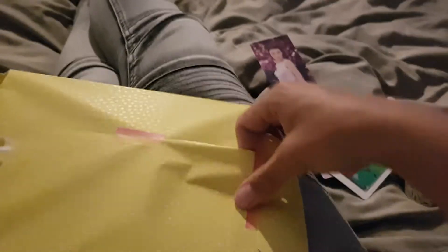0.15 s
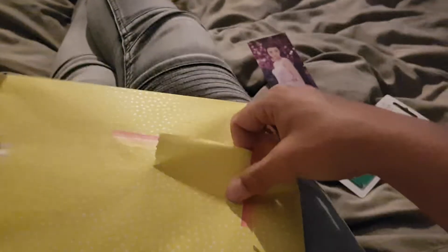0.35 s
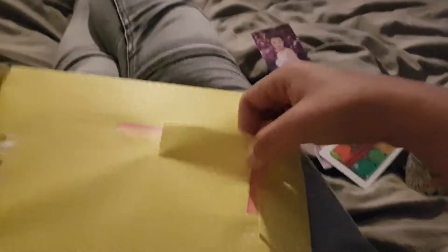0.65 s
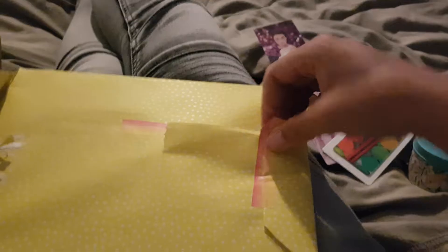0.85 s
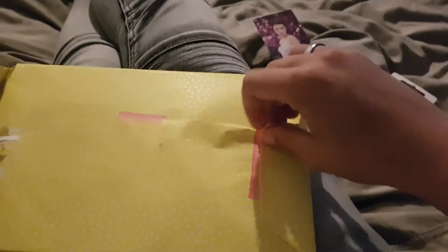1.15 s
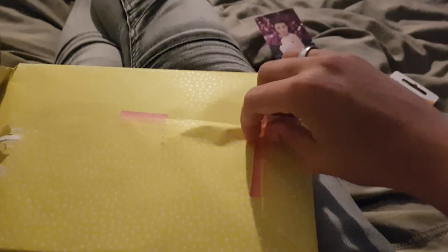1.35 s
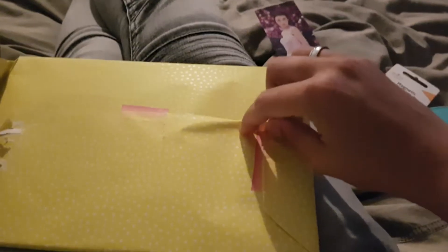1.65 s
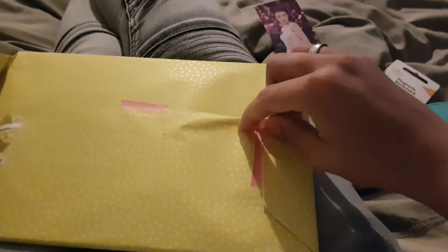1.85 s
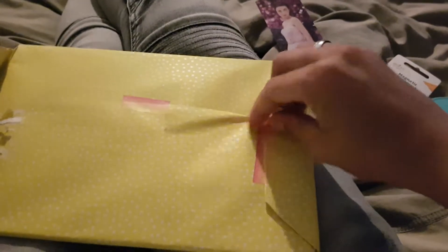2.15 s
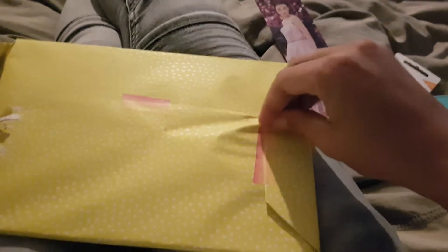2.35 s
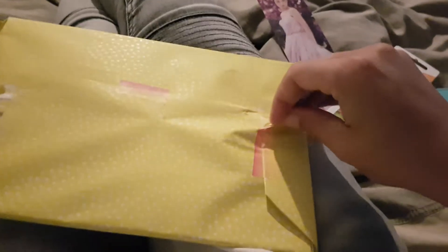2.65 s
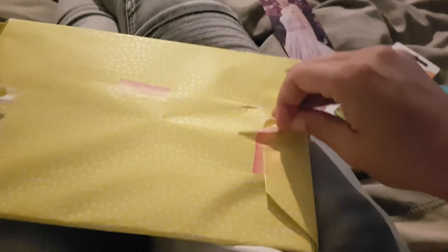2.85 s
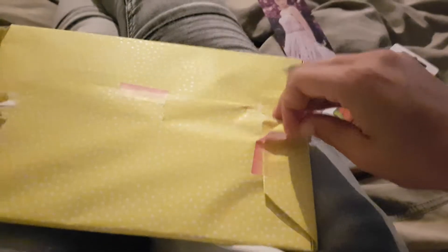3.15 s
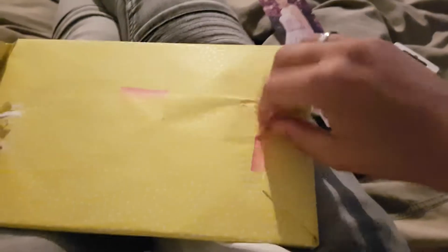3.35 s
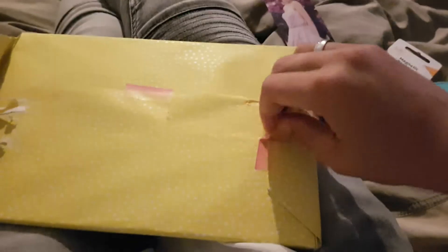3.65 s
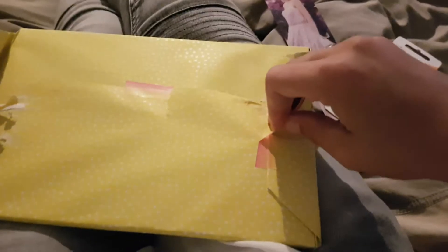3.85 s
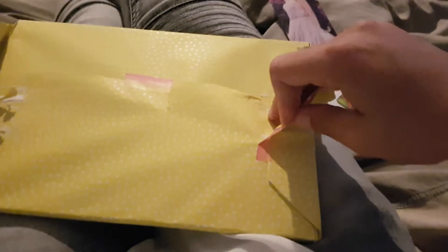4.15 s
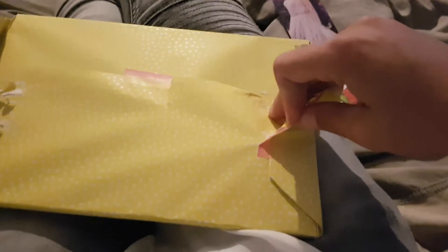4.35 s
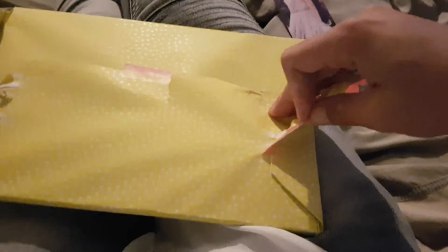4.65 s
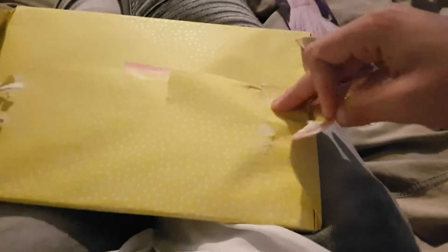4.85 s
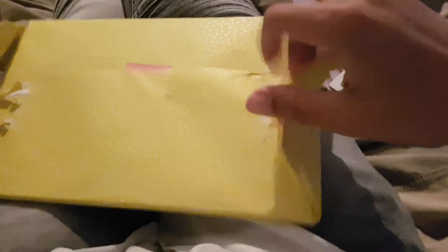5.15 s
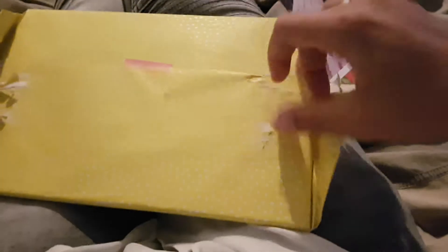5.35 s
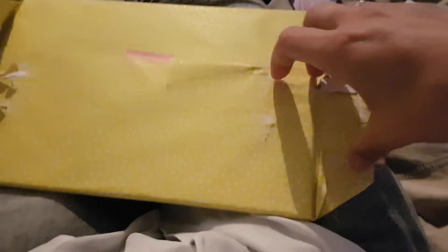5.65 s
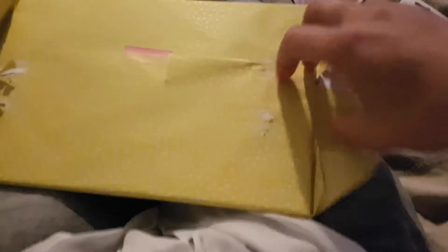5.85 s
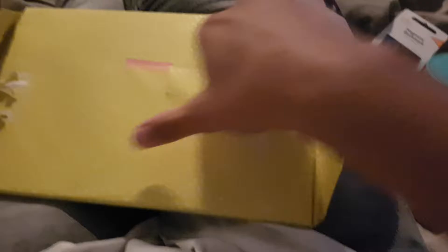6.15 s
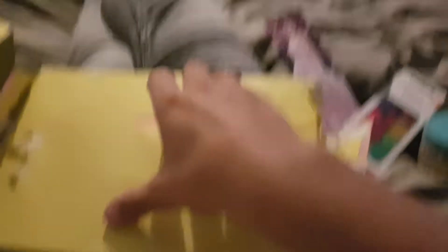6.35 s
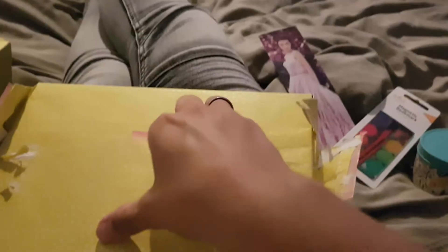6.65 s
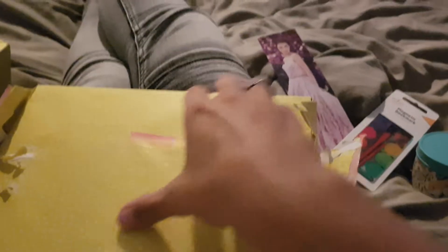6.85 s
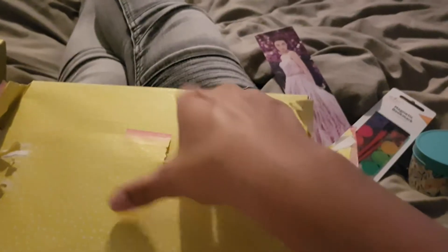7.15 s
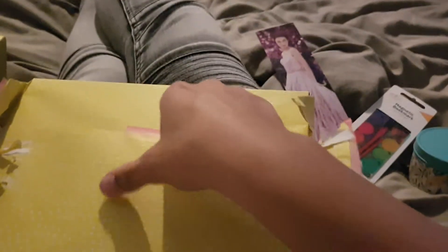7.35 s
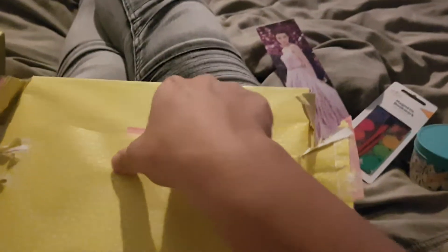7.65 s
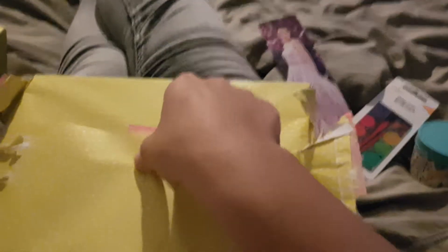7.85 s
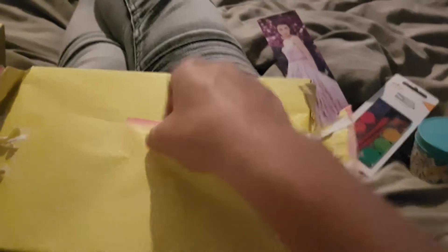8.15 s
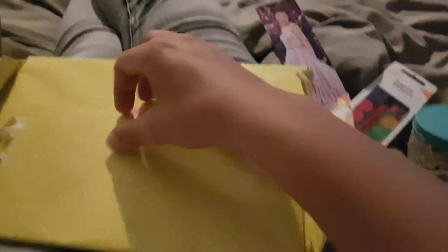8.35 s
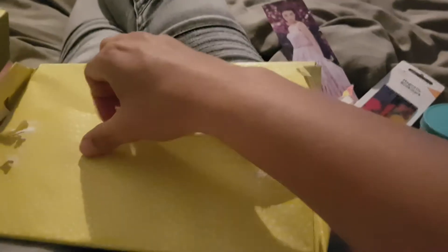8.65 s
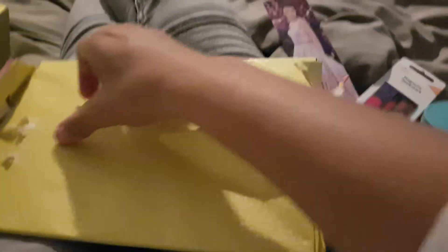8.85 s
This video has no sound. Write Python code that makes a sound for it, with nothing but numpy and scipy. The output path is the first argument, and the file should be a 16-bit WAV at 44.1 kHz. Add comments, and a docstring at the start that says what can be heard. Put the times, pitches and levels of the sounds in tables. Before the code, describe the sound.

Crisp paper snaps and short rips come in clumps, each with a dry bright edge and a little hollow box knock. A hard burst opens, quiet picking follows, tearing grows loud again midway, then skin brushes and rubs over the sheet as the parcel shifts. Close handheld microphone in a quiet furnished bedroom, with slight hiss and low hum.

```python
"""Stiff wrapping paper snaps and crackles as a hand picks open a taped box on a lap, close to a phone.
Each snap is a facet of paper flipping over: its ringing, its sharp fold and the hollow box sound together.
Random clicks make the crackle of paper and tape; rubbing noise follows the hand as it slides and turns the box.
A small soft-furnished room adds echoes and a short tail, over a faint low hum and microphone hiss."""
import sys
import numpy as np
from scipy import signal
from scipy.fft import rfft, irfft, next_fast_len
from scipy.io import wavfile
from scipy.ndimage import uniform_filter1d, map_coordinates

SR = 44100
rng = np.random.default_rng(int(sys.argv[2]) if len(sys.argv) > 2 else 0)


def wrap_up_sound(samples):
    """Save the sound to the file named by the first command line argument, as 16-bit audio."""
    columns = np.atleast_2d(samples).T
    # keep every value between -1 and 1, then stretch to whole-number steps
    tamed = np.clip(columns, -1, 1)
    steps = np.round(tamed * 32767).astype(np.int16)
    wavfile.write(sys.argv[1], SR, steps)


N = 396459  # length of the scene in samples
MS = SR / 1000  # samples in a millisecond

# colour of sharp creases in the paper: pitch_hz [Hz], gain_db [dB, relative]
CREASE_TONE = [(3500, -49), (6000, -7), (7400, -5), (8900, 3.5), (11300, 2), (13000, 0.5), (15300, -2.5),
               (17000, -18)]
# the free part of the sheet rings higher as it is pulled taut: time_s [s], pitch_hz [Hz]
TAUTNESS = [(0, 2534), (.3, 3354), (.85, 2430), (1.02, 3160), (2.1, 3550), (3.18, 3660), (3.46, 2200),
            (3.6, 3100), (4.33, 2840), (5.11, 2190), (5.299, 3500), (5.5, 2210), (6.8, 1553), (7.05, 3283),
            (7.44, 2540), (7.99, 2817), (8.55, 1880), (8.99, 2466)]
# how the hand works the paper: time_s [s], crackle_share [0-1, the rest is smooth sliding],
# apart_share [0-1, share of the sound that differs between the microphones]
GRIP_STYLE = [(0, 0.1, 0.37), (.6, 0.12, 0.42), (1.6, 0.4, 0.31), (1.9, 0.93, 0.63), (2.5, 0.67, 0.37),
              (3.15, 0.52, 0.21), (3.45, 0.62, .4), (4.1, 0.66, 0.59), (4.7, 0.23, 0.32), (5.5, 0.4, 0.37),
              (5.85, .3, 0.81), (6.2, 0, 0.72), (7.1, .05, .75), (7.45, 0.06, 0.91), (7.95, 0.2, .7),
              (8.2, .06, 1), (8.99, 0.02, 0.87)]
# the hand slides over the parcel and shifts it on the lap: start_s [s, at full strength], attack_s [s],
# hold_s [s], release_s [s], rub_db [dB before channel trims], shuffle_db [dB before channel trims],
# patch_hz [Hz, resonance of the patch under the hand]
HAND_STROKES = [(0, .01, 0.16, 0.52, -60, -66, 1150), (0.248, 0.037, 0, 0.011, -45, -49, 800),
                (.339, 0.054, 0, .035, -40.5, -46, 1093), (0.422, .05, 0.11, .16, -61.5, -64, 1410),
                (.76, .06, .4, .35, -65.5, -62.5, 1230), (1.497, .05, 0, .08, -65, -73, 1060),
                (1.718, .04, 0, 0.069, -62.5, -75, 1020), (2.455, 0.15, 0.06, .3, -62, -71, 1050),
                (2.863, 0.064, 0, 0.11, -62, -60, 1192), (3.304, 0.029, 0.42, 0.098, -64.5, -67.5, 1454),
                (3.792, .1, 0, 0.23, -53, -62.5, 1438), (4.16, 0.079, 0, 0.04, -47.5, -58, 1480),
                (4.279, 0.046, 0.0086, 0.28, -62, -63.5, 1490), (4.61, 0.087, 0, .16, -55, -57, 1325),
                (4.778, 0.043, 0.01, 0.067, -38.5, -55, 1080), (4.929, 0.074, 0, 0.034, -53, -70, 970),
                (5.138, 0.16, 0.018, 0.038, -53, -63, 1490), (5.248, .04, 0.0028, .09, -56.5, -53, 1066),
                (5.557, .1, 0.0074, .18, -57, -60, 1660), (5.807, 0.069, 0, 0.05, -49.5, -66, 1170),
                (5.917, 0.033, 0.024, 0.07, -50.5, -55, 1260), (6.033, 0.058, 0.017, .09, -48, -63, 1350),
                (6.215, 0.18, 0.049, 0.41, -56.5, -66, 1349), (6.465, 0.038, 0.0064, .035, -48, -69, 761.4),
                (6.565, 0.078, 0.016, 0.031, -42, -55, 700), (6.79, 0.092, 0.11, .1, -59, -72, 1174),
                (6.941, 0.13, 0.14, .1, -53, -65.5, 708), (7.115, 0.1, 0, .1, -45.5, -59.5, 1230),
                (7.311, 0.056, 0.11, 0.13, -55, -60.5, 1180), (7.772, .2, 0, 0.054, -56, -56, 1270),
                (7.932, 0.16, 0.022, 0.17, -58.5, -61.5, 1395), (8.154, 0.034, 0.16, .1, -61, -67.5, 1175),
                (8.491, 0.24, 0, 0.042, -51.5, -62.5, 997), (8.544, .035, .03, .18, -47, -60.5, 825),
                (8.75, .06, 0.0018, .1, -58, -81, 920), (8.93, .15, .06, .1, -61.5, -67, 987)]


def snaps():
    """The sheet buckles and rips in single snaps, with small ticks and finger taps between them."""
    # large snaps: start_s [s], level_db [dB rms over a millisecond], pitch_hz [Hz, of the facet],
    # edge_db [dB over the level, crisp fold], knock_db [dB over the level, box, before 0.5 dB is added],
    # crumble [0-1, share of the energy in crumbling], pan_db [dB, left over right]
    large_snaps = [(.0888, -35, 2810, -2, -7, 0.95, 1), (.093, -39, 3270, 1, -22, 0.22, 5),
                   (.1465, -25.5, 2915, 0, -10.5, 0.27, 0), (.2482, -29, 2090, -1.5, 0.5, 0.36, 0.5),
                   (.2791, -26, 3440, 0, -6.5, 0.64, 2), (.3116, -25, 2610, -3, -7, 0.66, -1),
                   (.3282, -14.5, 3390, -2, -17, 0.7, 2), (.3419, -30, 3500, 6, -3, 1, 3),
                   (.3592, -25.5, 2900, 3, -9.5, 0.87, 0), (.4719, -43, 1966, -17, 1, 0.6, 2),
                   (.481, -42.5, 1400, -14, -7.5, 0.72, 2), (.7443, -40, 2650, -4.5, -9, 0.41, 1.5),
                   (.9554, -43.5, 2703, 0, -6, .6, -1), (.9623, -40, 3765, -7, -15.5, 0.46, 3),
                   (1.13, -53, 1500, -2, 5.5, 0.5, -1), (1.1655, -45.5, 1850, -5, -5.5, 0.8, -3),
                   (1.2192, -51.5, 3000, 3.5, -7, 0.93, 1), (1.3337, -54, 3400, 13.5, -19, 0.6, 5),
                   (1.7151, -45.5, 3400, 2.5, -2, 0.44, 4), (1.957, -52.5, 3000, 11, 1.5, 0.93, 4.5),
                   (1.9836, -54.5, 4400, 21.5, 7, 0.97, 1), (2.0895, -55.5, 3420, 12, -3, 0.3, 1),
                   (2.1175, -50, 3200, 10, -13, 0.72, 2), (2.2346, -32, 3690, -5, -31, 0.12, 3.5),
                   (2.4543, -47.5, 2700, -1, 2, 0.83, 0), (2.5646, -34.5, 3615, -12, -17.5, 0, 4),
                   (2.5736, -40.5, 3570, -8, -13, 0.5, -6), (2.5351, -44.5, 3314, -3, -18, 0.97, 0),
                   (2.7223, -44, 4130, -7, -18, 0, 0), (2.741, -47, 3700, 1, -21, .36, 0),
                   (2.7783, -41, 3550, 7, -28.5, 0.26, 1), (2.9501, -37, 4300, 9.5, -7, .3, 1),
                   (3.0235, -40.5, 3900, -14, -30, 0.56, 0), (3.0334, -38, 3450, -0.5, -19, 0.27, -4),
                   (3.1002, -42.5, 3600, -3, -13, .45, -2), (3.2977, -49.5, 3100, -6, -6, 0.87, 3),
                   (3.3988, -46.5, 2070, -15, -4, 0.83, 4), (3.4782, -57, 1685, 8, 3, 0.69, -1.5),
                   (3.634, -46.5, 2754, 2.5, -1, 1, 1), (3.6939, -41, 3225, -1, -11, 0.19, 0.5),
                   (3.7668, -34, 3050, 0, -12, 0.57, 3), (3.8037, -42.5, 2300, -17.5, -7, .05, -4),
                   (3.8146, -40, 2410, -22, -3, 0.02, 4), (3.8922, -34, 2530, -6, -9, .97, 4),
                   (3.8988, -35, 2805, -1, -7.5, 0.69, 2.5), (3.9892, -43, 2723, 2.5, -15, 0.45, 8),
                   (4.0181, -26, 3020, -11.5, -9.5, 0.63, 4), (4.0529, -37.5, 2900, -4, -10, .43, 0),
                   (4.0955, -35, 2640, -2, -17, 0.86, 5.5), (4.1652, -31.5, 2588, -8, -21.5, 0.46, 6),
                   (4.2136, -37.5, 2843, -2.5, -16, 0.34, 4), (4.3176, -36, 3100, -9, -17, 0.1, 5),
                   (4.4668, -37, 2920, -8, -17.5, 0.33, 9), (4.4806, -39, 3040, -3, -18, 0.14, 0),
                   (4.568, -40.5, 2900, 3.5, -9, 0.23, 3), (4.6093, -20.5, 2380, -11, -8.5, 0.3, 3.5),
                   (4.6272, -31, 2860, 0, -11, 0.34, -3.5), (4.651, -37, 2980, 1, -11, 0.86, 2),
                   (4.671, -36.5, 2980, 0, -21, 0.25, -3), (4.7443, -32, 2820, -0.5, -12.5, 0.8, 1),
                   (4.7741, -15, 2770, -2, -9.5, 0.42, 2), (4.8255, -40, 3700, 5, -17, 0.36, -1.5),
                   (4.8372, -34.5, 2800, 8, -10.5, 0.66, -.5), (4.9099, -34.5, 1850, -3.5, -3, 0.56, 3.5),
                   (5.0707, -46, 3140, -5, -12, 0.27, 2), (5.0937, -37.5, 3000, -10, -10, 0.64, 1.5),
                   (5.129, -35.5, 1850, -17, -24.5, 0.77, 1), (5.1425, -43, 1790, -14, -24, 0.84, 5),
                   (5.2403, -32.5, 2940, -1, -5, 1, 1), (5.2603, -33.5, 4910, 3, -24, 0.64, 2),
                   (5.3397, -53, 3230, 10.5, -4, .5, -1), (5.3473, -49, 3155, 11.5, -4, 0.9, 8),
                   (5.5455, -36.5, 2088, -21, -13, 0.5, 5), (5.7782, -45, 1832, -6, 6, 0.4, 0),
                   (5.7922, -40, 1476, -11, -4, 0.32, -1), (5.8112, -38.5, 2090, -16, -0.5, 0.2, -1),
                   (5.8278, -36, 1810, -22, -14, 0.88, 4), (5.8395, -38.5, 2790, -14.5, 0, 0.47, -1),
                   (5.9523, -42, 2190, -17, -0.5, 0.61, 2), (6.2063, -44.5, 2660, -0.5, -3, 0.76, 2.5),
                   (6.6569, -43, 2090, 1.5, 5.5, 0.62, 0), (6.7003, -44.5, 1646, -18.5, -2, 1, -0.5),
                   (6.9946, -44, 4024, -14, -12, 0.24, 8), (7.0796, -41, 3224, 10.5, -7, 0.66, 0),
                   (7.1921, -30.5, 3050, -9, -4, 0.78, 2.5), (7.285, -39, 2976, -3, -5, 0.74, 4),
                   (7.3172, -49.5, 2000, -10.5, 10.5, .35, 1), (7.3947, -34, 2707, -9, -1, .98, 1),
                   (7.472, -42.5, 3330, 11, -1.5, 0.66, 1.5), (7.7672, -40, 3560, 4.5, -6.5, 0.3, 5.5),
                   (7.9284, -43, 4470, 8.5, -13, 0.57, 4.5), (7.9866, -37, 3110, 1.5, -13.5, 0.33, 6),
                   (8.062, -44.5, 2160, -3.5, -6, 1, -1), (8.216, -48.5, 2000, -3.5, 7.5, 0.7, 0.5),
                   (8.3226, -43, 2730, 7, -6, 0.93, 3)]
    out = np.zeros((2, N + SR))
    rows = list(large_snaps) + ticks(count=75) + finger_taps(count=45)
    for start_s, level_db, pitch_hz, edge_db, knock_db, crumble, pan_db in rows:
        sound = snap(pitch_hz, edge_db, knock_db, crumble, damping=0.49, crumble_ms=4.44,
                     lead_ms=1.0, ripple_db=1.5, travel_ms=1.71)
        start = max(round(start_s * SR - 3 * MS), 0)  # the flip comes 3 ms into the sound
        sides = amp([[level_db + pan_db / 2], [level_db - pan_db / 2]])
        out[:, start:start + sound.shape[1]] += np.sqrt(MS) * sides * sound
    return out[:, :N]


def snap(pitch_hz, edge_db, knock_db, crumble, damping, crumble_ms, lead_ms, ripple_db, travel_ms, size=4096):
    """One facet flips over amid a burst of tiny creases; the facet, its sharp fold and the box all ring."""
    # modes of the wrapped box: pitch_hz [Hz], width_hz [Hz], level_db [dB before a random change]
    box_modes = [(183, 47, -11.5), (260, 150, -10), (418, 42, -4.5), (495, 47, -5.5), (610, 50, -8.5),
                 (696, 120, -14.5), (862, 96, -1.5), (1090, 470, -7), (1170, 86, -5)]
    # tone of a flipping facet: pitch_hz [Hz], gain_db [dB, relative]
    facet_tone = [(400, -28), (700, -2), (950, 3), (1400, 3), (2000, 6), (2500, 1.5), (3200, 1),
                  (4300, 3.5), (5200, 1.5), (7000, -5.5), (10000, -25.5)]
    t_ms = np.arange(size) / MS - 3
    crumble = np.clip(crumble, 0, 1)

    # bending waves are dispersive: a long rip sends its highs ahead of its lows
    bins = np.fft.rfftfreq(size, 1 / SR)
    late = crumble * travel_ms * MS * (np.exp(-bins / 7000) - .5)
    click = np.arange(size) == np.argmin(np.abs(t_ms))
    flip = irfft(rfft(click) * np.exp(-2j * np.pi * np.cumsum(late) / size))

    swell = np.exp(-np.maximum(t_ms / crumble_ms, -t_ms / lead_ms))
    uneven_size = amp(4.9 * rng.standard_normal(size))
    creases = swell * uneven_size * ports(rng.standard_normal((3, size)), apart=0.46)

    def strike(response):
        """The flip and the creases both excite one response, at energy 1 in each channel."""
        burst = one_blow(through(creases, response))
        clean = through(flip[None], response)
        return one_blow(np.sqrt(1 - crumble) * clean + np.sqrt(crumble) * burst)

    # every facet has its own shape, and so its own uneven set of modes
    knots = np.geomspace(300, SR / 2, num=40)
    uneven = np.column_stack([knots, ripple_db * rng.standard_normal(len(knots))])

    def facet_gain(hz):
        """A damped mode at the facet's pitch, coloured like paper."""
        mode = np.abs(resonance(hz, pitch_hz, damping * pitch_hz))
        return mode * amp(along(facet_tone, hz) + along(uneven, hz))

    def fold_gain(hz):
        """The bright colour of a sharp crease."""
        return amp(along(CREASE_TONE, hz) + along(uneven, hz))

    def box_gain(hz):
        """The box modes, struck a little differently each time, with softened highs."""
        power = 0
        for centre, width, db in box_modes:
            power += np.abs(amp(db + rng.normal(0, 1.2)) * resonance(hz, centre, width)) ** 2
        return np.sqrt(power) / np.sqrt(1 + (hz / 1800) ** 4)

    sound = strike(ring(facet_gain))
    sound = sound + amp(edge_db) * strike(ring(fold_gain))
    sound = sound + amp(knock_db + 0.5) * strike(ring(box_gain))
    # its place on the sheet sets which microphone hears it first
    return delayed(sound, lag=rng.normal(0.11, 0.58))


def ticks(count):
    """Small facets flip at random: denser under a firm grip, louder with the pull, pitched by the tautness."""
    crackle, edge = pull_gains()
    grip, taut_hz = np.clip(curves(GRIP_STYLE)[0], 0, 1), curves(TAUTNESS)[0]
    at = moments((grip + 0.02) * np.minimum(crackle, amp(-59)) ** 2, count)
    level, pitch, knock, crumble, pan = rng.standard_normal((count, 5)).T
    pull_db = 20 * np.log10(crackle[at])
    # -49.5 dB at an average pull, 0.46 dB more per dB of pull, 2 dB scatter
    level_db = -49.5 + 0.46 * (pull_db - pull_db.mean()) + 2 * level
    pitch_hz = taut_hz[at] * np.exp(0.12 * pitch)
    edge_db = 4 + 20 * np.log10(edge[at] / crackle[at])  # 4 dB crisper than the pull
    knock_db = -12.5 + 4 * knock
    return list(zip(at / SR, level_db, pitch_hz, edge_db, knock_db, 0.39 + 0.2 * crumble, 1.5 + 3 * pan))


def finger_taps(count):
    """A sliding fingertip catches at random and taps the box dully, louder the harder it rubs."""
    rub, _ = stroke_gains()
    at = moments(np.minimum(rub, amp(-62)) ** 2, count)
    level, pitch, knock, crumble, pan = rng.standard_normal((count, 5)).T
    rub_db = 20 * np.log10(rub[at])
    # -52 dB at an average stroke, 0.28 dB more per dB of rubbing, 1.5 dB scatter
    level_db = -52 + 0.28 * (rub_db - rub_db.mean()) + 1.5 * level
    pitch_hz = 1650 * np.exp(0.2 * pitch)
    edge_db = np.full(count, -13)
    knock_db = 0.5 + 2.5 * knock
    return list(zip(at / SR, level_db, pitch_hz, edge_db, knock_db, 0.5 + 0.2 * crumble, 1.2 + 1.8 * pan))


def crinkle():
    """Gripped paper and tape let go in clumps of tiny clicks; paper that slides only rustles."""
    # colour of the sheet: pitch_hz [Hz], gain_db [dB, relative]
    sheet_tone = [(500, -48), (1200, -2.5), (1650, -2.5), (2050, 0.5), (2600, 2.5), (3400, 1.5), (4400, 0),
                  (5200, -4), (6800, -7), (9000, -62.5)]
    # colour of paper brushing past skin: pitch_hz [Hz], gain_db [dB, relative]
    brush_tone = [(2500, -15.5), (5000, -2.5), (7200, -6.5), (9000, -1), (11500, -1.5), (15000, -5.5),
                  (17000, -15)]
    crackle, edge = pull_gains()
    grip, apart = np.clip(curves(GRIP_STYLE), 0, 1)
    clumps = unit(amp(1.2 * wobble(110)))
    clicks = np.sqrt(grip) * clumps * grains(rate=260, spread_db=2.5, apart=apart)
    rustle = np.sqrt(1 - grip) * clumps * grains(rate=14000, spread_db=0.5, apart=apart + 0.092)
    sheet = coloured(clicks + rustle, sheet_tone)
    sheet = steered(sheet, TAUTNESS, octaves=0.98, lift_db=5.5, patchy_db=1)

    # the short waves of the sharp creases reach the two microphones unalike
    fine = clicks + amp(7.5) * np.sqrt(grip) * grains(rate=480, spread_db=2.0, apart=1)
    creases = np.sqrt(grip.mean()) * coloured(fine, CREASE_TONE)
    sliding = np.sqrt(1 - grip) * grains(rate=14000, spread_db=2.0, apart=apart + 0.42)
    brush = np.sqrt(1 - grip.mean()) * coloured(sliding, brush_tone)
    return (crackle * sheet + edge * (creases + brush)) * amp([[-1.6], [-2.8]])


def pull_gains():
    """How strongly the pulling hand stirs the sheet, and its sharp creases."""
    # the hand pulls the paper or peels tape: start_s [s, at full strength], attack_s [s], hold_s [s],
    # release_s [s], crackle_db [dB before channel trims], edge_db [dB over the crackle, crisp edge]
    pull_table = [(0, .01, 0.0098, .28, -52, 1), (0.169, .08, 0, 0.056, -51, -1.5),
                  (.249, 0.032, 0, 0.022, -42.5, -4), (0.333, .12, 0.017, .09, -42, -1),
                  (.43, .05, .12, .1, -59, 0), (.6, .05, 0.023, .25, -60, -9),
                  (0.748, .03, .14, .07, -56, -6.5), (0.964, .05, 0.00035, .12, -53, -1),
                  (1.208, .3, .08, .08, -61.5, 1.5), (1.337, .06, 0.0017, .05, -53, -7),
                  (1.497, .05, 0, .045, -51, -2.5), (1.59, .03, 0.016, .08, -69, 2),
                  (1.717, .02, 0.022, .03, -57.5, 8), (1.976, .1, 0.025, .08, -62, 9),
                  (2.101, .05, .05, .1, -68, 12.5), (2.234, .02, .035, .05, -61, 11),
                  (2.305, .03, .1, .05, -68, 4), (2.452, .03, .08, .24, -52.5, 4),
                  (2.702, .1, .44, .05, -57.5, 5), (3.294, .025, 0.0094, .12, -61, -3.5),
                  (3.398, .08, .04, .33, -62, 1), (3.642, .06, 0.016, .07, -59, -0.5),
                  (3.771, .09, 0, .22, -46.5, -2), (4.021, .025, 0.012, .18, -42, -2.5),
                  (4.161, 0.0526, 0, .065, -42, 1), (4.288, .1, .09, .06, -55.5, 1.5),
                  (4.45, .04, 0.0023, 0.18, -50, 0), (4.616, .15, .05, .045, -44, -4.5),
                  (4.769, .06, 0.011, .07, -41.5, 2), (4.918, .02, 0.0072, .16, -61, 1.5),
                  (5.125, .07, 0.019, .045, -54, -1.5), (5.244, .012, 0.013, .06, -54, 9.5),
                  (5.345, .015, .05, .04, -66, 10), (5.553, .12, .035, .13, -51.5, 2),
                  (5.837, .11, 0, .035, -51, 3), (5.927, .07, 0.0071, .1, -53, -1.5),
                  (6.056, .09, 0.0016, .09, -53, -5), (6.192, .06, .15, .1, -64, 8),
                  (6.464, .02, .13, .04, -64, 4), (6.658, 0.018, .11, .12, -67, 4.5),
                  (6.863, .1, .1, 0.045, -69, 1.5), (7.034, .07, 0.033, .05, -53.5, 5),
                  (7.09, .06, .03, .09, -46.5, 4.5), (7.2, .02, .024, .03, -51, 1.5),
                  (7.293, .03, .17, .05, -50.5, -2.5), (7.688, .15, .03, .05, -64, 0),
                  (7.764, .06, 0.014, .06, -52, 3), (7.931, .14, .04, .13, -55.5, 3.5),
                  (8.192, .07, 0.0053, .07, -50.5, 1.5), (8.311, .025, 0, .14, -53, 6),
                  (8.489, .2, .12, .12, -59.5, -2), (8.77, .09, 0, .05, -57.5, 1.5),
                  (8.95, .1, .04, .1, -66.5, 5.5)]
    *timing, crackle_db, edge_db = np.transpose(pull_table)
    timing = np.transpose(timing)
    # between pulls the resting hand still stirs the paper a little
    return moves(timing, crackle_db, rest_db=-77), moves(timing, crackle_db + edge_db, rest_db=-73.5)


def rubbing():
    """Skin slides over the paper with a dull rasp or, gripping, taps in single slips; the box shuffles on the lap."""
    # colour of skin on paper: pitch_hz [Hz], gain_db [dB, relative]
    skin_tone = [(250, -25.5), (400, 0), (500, -0.5), (740, 5), (900, -4), (1100, -3.5), (1400, 2.5),
                 (1700, 2.5), (2100, -22.5), (3500, -14.5)]
    # colour of the hollow box shuffling: pitch_hz [Hz], gain_db [dB, relative]
    hollow_tone = [(40, -32), (90, -1.5), (170, 0.5), (290, 1), (400, -3), (500, -3.5), (800, -21)]
    rub, shift = stroke_gains()
    patch = [(start_s, patch_hz) for start_s, *_, patch_hz in HAND_STROKES]
    grip = np.clip(curves(GRIP_STYLE)[0], 0, 1)
    sliding = grains(rate=900, spread_db=3, apart=0.11) * amp(2.9 * wobble(60))
    taps = grains(rate=70, spread_db=6.5, apart=0.34)
    slips = np.sqrt(1 - grip) * unit(sliding) + np.sqrt(grip) * taps
    rasp = steered(coloured(slips, skin_tone), patch, octaves=0.74, lift_db=9.5, patchy_db=1.5)
    shuffle = coloured(grains(rate=500, spread_db=1.5, apart=0.12), hollow_tone)
    rasp = rub * rasp * amp([[-1.6], [-2.4]])
    shuffle = shift * shuffle * amp([[-2.4], [-2.6]])
    return delayed(rasp + shuffle, lag=2.1)


def stroke_gains():
    """How strongly the sliding hand rubs the paper, and shifts the box."""
    *timing, rub_db, shuffle_db, _ = np.transpose(HAND_STROKES)
    timing = np.transpose(timing)
    # between strokes the resting hand still stirs the parcel a little
    return moves(timing, rub_db, rest_db=-77), moves(timing, shuffle_db, rest_db=-68.5)


def bumps():
    """A wall of the box pops back or bumps the lap, and sways as a decaying sine."""
    # bumps: start_s [s], peak_db [dB], pitch_hz [Hz], t60_s [s, time to fall by 60 dB]
    bump_table = [(.247, -33, 416, 0.019), (.279, -39.5, 420, 0.02), (.312, -36.5, 563, 0.069),
                  (.328, -26.5, 491, 0.024), (.745, -49, 194, 0.038), (4.609, -37.5, 1055, 0.058),
                  (4.66, -56, 72.1, .2), (4.767, -55.5, 91.4, 0.073), (4.776, -30.5, 898, 0.047),
                  (5.125, -58, 64.6, 0.24), (5.236, -45, 199, 0.03), (5.604, -48.5, 374, .019),
                  (5.946, -49, 348, .09), (7.189, -42, 381, 0.027), (7.378, -50.5, 409, 0.051)]
    out, t = np.zeros(N + SR), np.arange(SR // 3) / SR
    for start_s, peak_db, pitch_hz, t60_s in bump_table:
        decay = np.exp(-np.log(1000) * t / t60_s)
        soft_start = 1 - np.exp(-t / 0.00093)
        sway = np.sin(2 * np.pi * pitch_hz * t) * decay * soft_start
        out[round(start_s * SR):][:len(t)] += amp(peak_db) * sway / np.abs(sway).max()
    return delayed(out[None, :N], lag=1.1)


def room(x, near_db, tail_db, count=6):
    """The parcel and arm throw back a few early echoes; the room adds a short tail of decaying noise."""
    # decay of the room: pitch_hz [Hz], t60_s [s, time to fall by 60 dB]
    room_decay = [(150, 0.2), (1000, 0.17), (4000, 0.17), (10000, 0.13), (16000, 0.15)]
    hz, t, z = signal.stft(rng.standard_normal((2, SR // 3)), SR, nperseg=256)
    fade = amp(-60 * t / along(room_decay, hz)[:, None])
    tail = signal.istft(z * fade, SR, nperseg=256)[1]
    tail_s = np.arange(tail.shape[1]) / SR
    tail = one_blow(tail * (1 - np.exp(-(tail_s / 0.0054) ** 2)))  # builds up over some milliseconds
    near = np.zeros_like(tail)
    for side in near:
        side[(rng.uniform(1.5, 6, count) * MS).astype(int)] = rng.standard_normal(count)
    return through(x, amp(near_db) * one_blow(near) + amp(tail_db) * tail)


def quiet():
    """Noise stands for still air and microphone hiss; a low sine wavers in pitch and level as the hum."""
    # colour of the background noise: pitch_hz [Hz], gain_db [dB, relative]
    quiet_tone = [(20, -23), (36, -16.5), (48, 0.5), (65, -6), (100, -5.5), (200, -8), (400, -12.5),
                  (800, -13.5), (2000, -17), (4000, -25), (7000, -42.5), (9500, -45.5), (16000, -20)]
    both, left, right = rng.standard_normal((3, N))
    # long waves reach both microphones alike; the hiss is each one's own
    bass = through(both[None], ring(lambda hz: 1 / np.sqrt(1 + (hz / 90) ** 2)))
    air = coloured(np.array([left, right]) + amp(-9.5) * both + amp(-28.0) * bass, quiet_tone)
    hum_hz = 49.5 + 2 * wobble(7)
    hum = np.sin(2 * np.pi * np.cumsum(hum_hz) / SR) * amp(3.4 * wobble(9))
    return amp(-66.0) * air + amp(-69.5) * hum


def moves(timing, levels_db, rest_db):
    """Gain of hand moves: each swells by 20 dB over its attack, holds, and sinks by 20 dB over its release."""
    fade_curve = 1.1  # above 1 the fade in dB steepens away from full strength
    t = np.arange(0, N, MS) / SR
    power = np.full(len(t), amp(rest_db) ** 2)
    for (start, attack, hold, release), db in zip(timing, levels_db):
        before = np.maximum(start - t, 0) / max(attack, 1 / SR)
        after = np.maximum(t - start - hold, 0) / max(release, 1 / SR)
        power += amp(db - 20 * (before + after) ** fade_curve) ** 2
    return np.interp(np.arange(N) / SR, t, np.sqrt(power))


def moments(busy, count):
    """Random sample positions that come closer together where busy is high."""
    total = np.cumsum(busy)
    return np.searchsorted(total / total[-1], (np.arange(count) + rng.random(count)) / count)


def grains(rate, spread_db, apart):
    """Stereo train of tiny slips, many weak and a few strong, rate a second."""
    size = amp(spread_db * np.minimum(rng.exponential(size=N), 4.5))  # capped so none sticks out
    happens = rng.random(N) < rate / SR
    return unit(happens * size * ports(rng.choice([-1, 1], (3, N)), apart))


def ports(draw, apart):
    """Left and right microphone from three independent rows: one that both hear and one each of their own."""
    apart = np.clip(apart, 0, 1)
    return np.sqrt(1 - apart) * draw[0] + np.sqrt(apart) * draw[1:]


def delayed(x, lag):
    """The left channel hears it 2 * lag samples before the right one."""
    m = next_fast_len(x.shape[1])
    turn = 2j * np.pi * np.fft.rfftfreq(m) * lag * np.array([[1], [-1]])
    return irfft(rfft(x, m) * np.exp(turn), m)[:, :x.shape[1]]


def steered(x, track, octaves, lift_db, patchy_db):
    """x through a broad moving resonance and drifting small ones, at unchanged power."""
    hz, t, z = signal.stft(x, SR, nperseg=256)
    centre = np.interp(t, *np.transpose(track))
    bump = np.exp(-(np.log2((hz[:, None] + 1) / centre) / octaves) ** 2)
    patches = uniform_filter1d(rng.standard_normal(bump.shape), size=2, axis=0)
    patches = unit(uniform_filter1d(patches, size=22, axis=1))
    gain = amp(lift_db * bump + patchy_db * patches)
    power = np.mean(np.abs(z) ** 2, axis=(0, 2))
    gain /= np.sqrt(power @ gain ** 2 / power.sum())
    return signal.istft(z * gain, SR, nperseg=256)[1][:, :N]


def coloured(x, points):
    """x given a spectrum, at rms 1."""
    return unit(through(x, ring(lambda hz: amp(along(points, hz)))))


def ring(gain, size=4096):
    """The causal (minimum-phase) impulse response, of energy 1, that has this gain over frequency."""
    cepstrum = irfft(np.log(np.maximum(gain(np.fft.rfftfreq(size, 1 / SR)), 1e-6)))
    # folding the cepstrum onto positive times makes the response start at once
    cepstrum[1:size // 2] *= 2
    cepstrum[size // 2 + 1:] = 0
    return one_blow(irfft(np.exp(rfft(cepstrum))))


def resonance(hz, centre, width):
    """Response of one damped mode."""
    return 1j * hz * width / (centre ** 2 - hz ** 2 + 1j * hz * width)


def through(x, response):
    """Each channel of x sent through an impulse response."""
    return signal.fftconvolve(x, np.atleast_2d(response), axes=1)[:, :x.shape[1]]


def along(points, hz):
    """(Hz, value) points read on a log axis."""
    f, v = np.transpose(points)
    return np.interp(np.log(hz + 1), np.log(f + 1), v)


def curves(rows):
    """One value per sample for each column after the time."""
    s, *cols = np.transpose(rows)
    return [np.interp(np.arange(N) / SR, s, c) for c in cols]


def wobble(rate):
    """A smooth random curve, rate knots a second."""
    return map_coordinates(rng.standard_normal(int(N * rate / SR) + 4), [np.arange(N) * rate / SR])


def amp(db):
    """Decibels to gain."""
    return 10 ** (np.asarray(db) / 20)


def unit(x):
    """Scaled to rms 1."""
    return x / np.sqrt(np.mean(x ** 2) + 1e-20)


def one_blow(x):
    """Scaled to energy 1 along time."""
    return x / np.sqrt(np.sum(x ** 2, axis=-1, keepdims=True) + 1e-20)


def scene():
    """Paper, box and hand in the room."""
    paper = snaps() + bumps() + crinkle() + rubbing()
    return paper + room(paper, near_db=-21, tail_db=-10) + quiet()


def record(dry):
    """The phone keeps almost nothing above its band limit: a very steep low-pass."""
    top_hz = 15950
    m = next_fast_len(N + SR // 2)
    hz = np.fft.rfftfreq(m, 1 / SR)
    return irfft(rfft(dry, m) / np.sqrt(1 + (hz / top_hz) ** 260), m)[:, :N]


dry = scene()
out = record(dry)
wrap_up_sound(out)
```